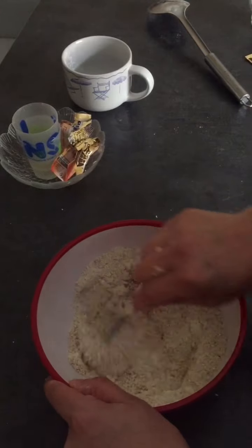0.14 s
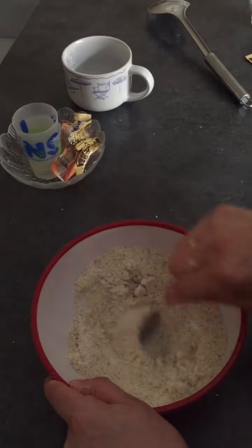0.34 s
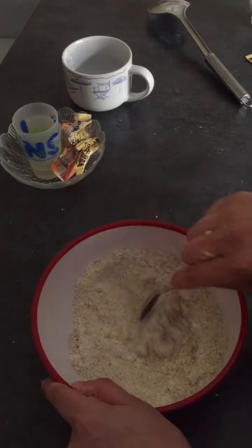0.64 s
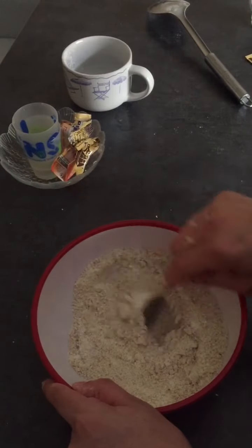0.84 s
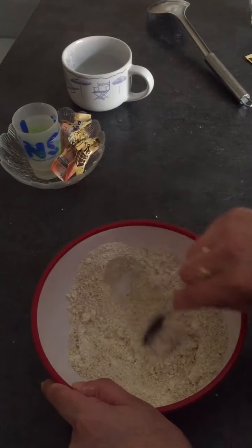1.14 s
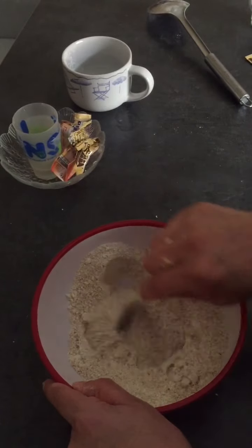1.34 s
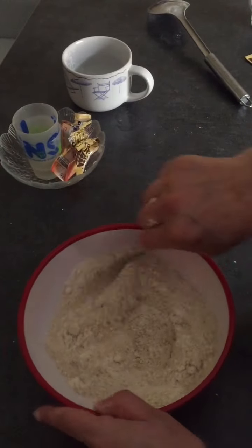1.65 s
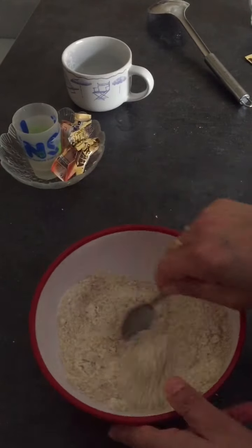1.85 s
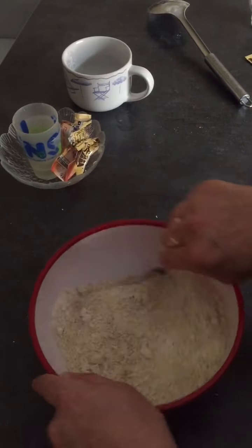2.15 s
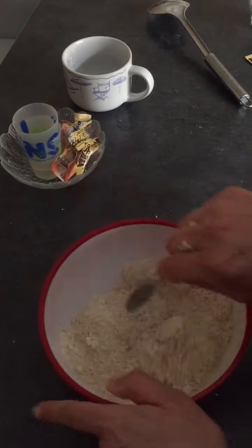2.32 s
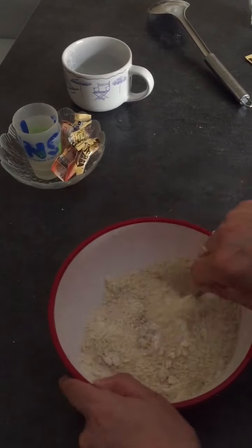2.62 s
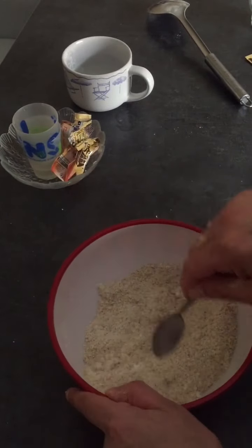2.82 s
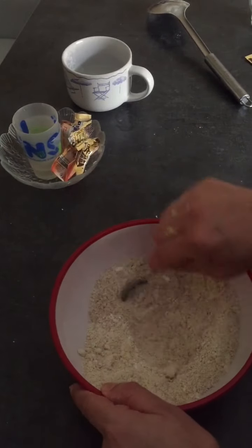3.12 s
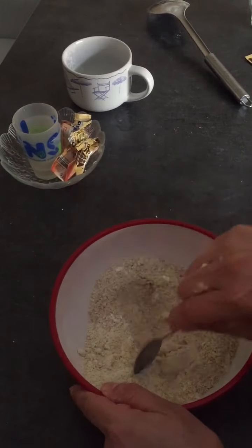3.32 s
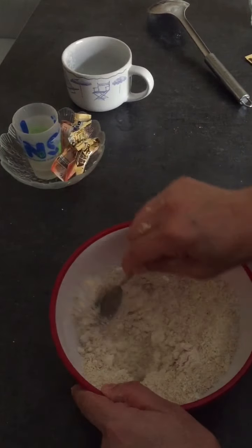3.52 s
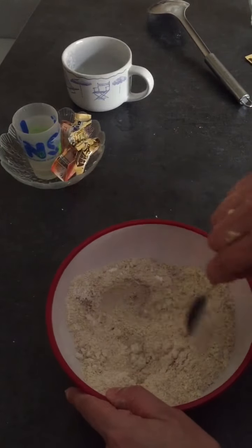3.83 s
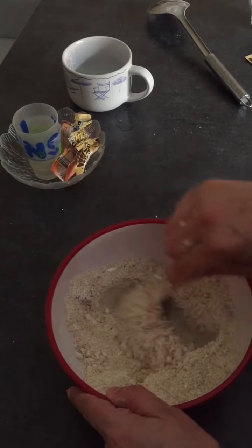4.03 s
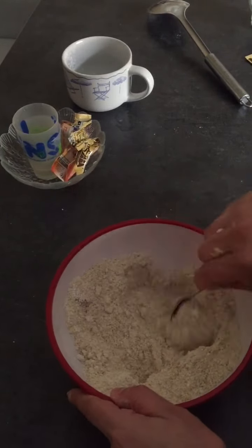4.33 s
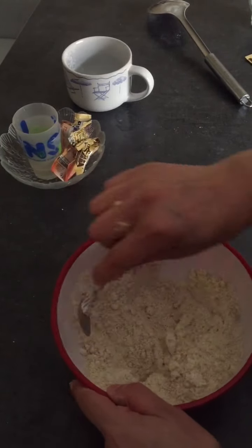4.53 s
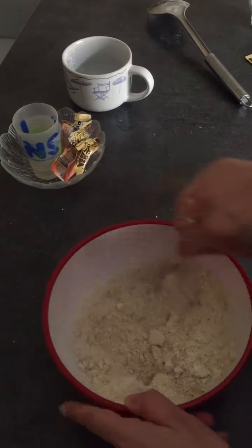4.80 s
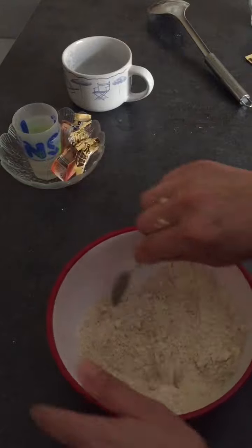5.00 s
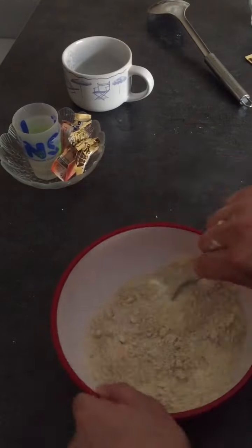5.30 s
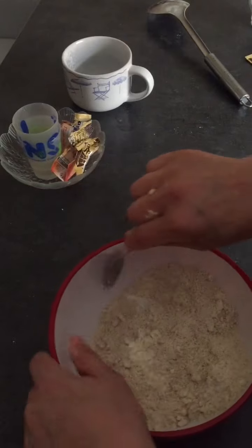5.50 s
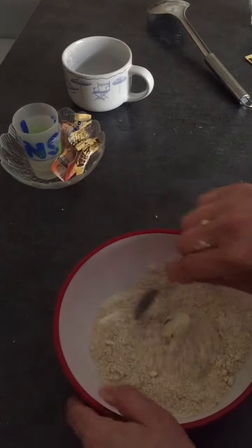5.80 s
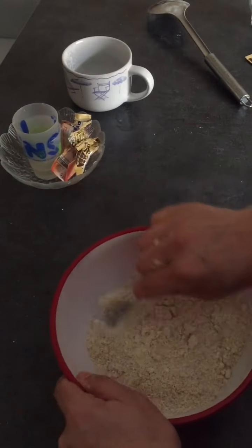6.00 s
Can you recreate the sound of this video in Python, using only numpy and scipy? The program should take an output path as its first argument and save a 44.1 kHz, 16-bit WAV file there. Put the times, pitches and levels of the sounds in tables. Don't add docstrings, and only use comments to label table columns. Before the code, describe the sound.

Close-up dry stirring in a quiet, lightly reverberant kitchen with steady low hum. Sparse soft spoon taps give way to crackling crumbs and rasping along the bowl wall, one loud sharp knock, a hollow bump as the bowl shifts on the counter, a pause, then renewed ticks, gritty sweeps and stronger knocks at the end.

```python
import sys
import numpy as np
from scipy import signal
from scipy.fft import rfft, irfft, next_fast_len
from scipy.io import wavfile
from scipy.ndimage import uniform_filter1d, map_coordinates

SR = 44100
rng = np.random.default_rng(int(sys.argv[2]) if len(sys.argv) > 2 else 0)


def persist_wave(psi):
    counts = np.round(np.clip(psi, -1, 1) * 32767).astype(np.int16)
    wavfile.write(sys.argv[1], SR, np.atleast_2d(counts).T)


def gain_from_decibels(decibels):
    exponent = np.asarray(decibels, float) / 20
    return 10 ** exponent


N = 271347
TIME = np.arange(N) / SR

# [t/s, edge level/dB, belly, flank and wall level/dB re edge]
TAPS = [(0.1612, -38, 0, -12, 11), (0.1903, -37, -14, -10, 5), (1.13, -44, -1, 8, -5),
        (1.6152, -29, -40, -5.5, 0.5), (2.139, -32.5, -12, -8, -5), (2.219, -26.5, -39, -15, -7),
        (2.5358, -6, -28, -11.5, -6), (3.5336, -45, 1, 9, 3), (4.0731, -29, -4, -33, -3.5),
        (4.3366, -34.5, -5.5, 5, 4.5), (4.3944, -38.5, -10, 1, -11), (4.7222, -33, -17.5, -33.5, 1.5),
        (4.777, -27.5, -46, -29, 1), (4.9045, -27.5, -6, -35, 8.5), (5.221, -18, -29, -3.5, -0.5),
        (5.6321, -20.5, -42, -2, 2.5), (6.0296, -9, -30, -17, -2.5), (6.0835, -29, -36, -9, 4)]
# [t/s, edge level/dB, belly, flank and wall level/dB re edge]
THUDS = [(2.2784, -41, 10.5, 1.5, 4), (3.2939, -51, 31.1, 39, 22.5), (3.3188, -58, 24, 26, 28),
         (5.035, -51.5, 16.4, -11, 12.5), (5.4494, -47.5, 15.4, -11, 1), (2.298, -47.5, 14, -5.5, -7.5),
         (4.957, -51.5, 14.7, -2, -8), (5.787, -51, 12, -3, -7), (2.322, -50, 15, -8, -8),
         (1.845, -58, 14, -8, -8), (5.236, -54, 14, -8, -8), (5.27, -54, 14, -8, -8),
         (3.365, -56, 14, -4, -8), (5.486, -54, 14, -8, -8), (4.908, -40, -4, -20, 8)]
# [t/s, edge level/dB]
TOUCHES = [
    (0.642, -56),
    (3.0498, -68),
    (3.1338, -60),
    (3.9988, -69),
]
# [belly, flank, wall level/dB re edge]
LIGHT_TOUCH = (-11.5, -13, -1)
# [f/Hz, level/dB, t60/s]
PART_MODES = [
    [(3823, -4, 0.0071), (4493, -5.5, 0.0079), (5433, -5.5, 0.0071), (6014, -6.5, 0.007), (7240, -17, 0.01),
     (8520, -13, 0.0083), (9300, -15.5, 0.0073)],
    [(244, -13, 0.059), (484, 1.5, 0.0086), (657, 2.5, 0.018), (766, 8, 0.02), (940, 1.5, 0.012)],
    [(1101, 5.5, 0.0055), (1321, 4.5, 0.0079), (1588, 0, 0.007), (1706, -5, 0.015)],
    [(2000, 0, 0.011), (2350, 1.5, 0.007)],
    [(2560, 1, 0.012), (2810, -4, 0.0071)],
    [(3140, -5, 0.012), (3280, -11, 0.013)],
    [(10220, 3, 0.0051), (10930, 1.5, 0.0036), (12370, 2, 0.0074), (13800, -3.5, .003),
     (15000, 0.5, 0.0025)],
]
EDGE_MODES, TIP_MODES = PART_MODES[0], PART_MODES[-1]
# [t/s, upper wall level/dB, rim level/dB, both re lower wall]
CONTACT_HEIGHT = [(0.2, -1.5, 0.5), (1.14, 7.5, -4.5), (1.62, -3, 0), (1.8, 11.5, -6), (2.0, 1, -3),
                  (2.15, 2.5, -1.5), (2.3, 6, -2), (2.55, -0.5, -1), (2.8, -1, -3), (3.4, -3.5, 0.5),
                  (4.1, -2, -2.5), (4.36, 1.5, -14), (4.74, -5.5, -9.5), (4.9, 0.5, -10.5),
                  (5.26, -4.5, -7), (5.66, -3, -15), (5.85, 7, -9.5), (6.05, -9, -1.5)]
height_s, upper_points, rim_points = np.transpose(CONTACT_HEIGHT)
UPPER_DB = np.interp(TIME, height_s, upper_points)
RIM_DB = np.interp(TIME, height_s, rim_points)


def spoon_strikes():
    hits = [(*row, -16.5) for row in TAPS]
    hits += [(*row, -7.5) for row in THUDS]
    hits += [(*row, *LIGHT_TOUCH, -16.5) for row in TOUCHES]
    knocks = []
    for s, edge_db, belly, flank, wall, tip in hits:
        at = round(s * SR)
        above = [0, belly, flank, wall + RIM_DB[at], wall, wall + UPPER_DB[at], tip]
        knock = sum(gain_from_decibels(db) * ring(modes, scatter=0.015) for modes, db in zip(PART_MODES, above))
        knocks.append((s, gain_from_decibels(edge_db - 5.0) * knock))
    return contacts(knocks)


# [t/s, level/dB,
# f/Hz]
TINKS = [(.1618, -38, 12500), (.163, -42, 9400), (.1635, -36, 4200), (.169, -36, 4300), (.174, -35, 4050),
         (4.0735, -38, 7400), (1.7842, -34, 6500), (1.68, -40, 4100), (5.7425, -34, 6300),
         (5.2205, -30, 6600), (.1714, -42, 12600), (.1905, -44, 8500), (1.1318, -50, 8600),
         (1.1405, -40, 3150), (1.143, -52, 12300), (1.6596, -40, 11700), (1.7095, -44, 12100),
         (1.7735, -38, 13000), (1.794, -36, 8400), (2.1929, -43, 11300), (2.2283, -41, 11400),
         (2.512, -58, 5200), (2.5358, -21, 12400), (2.5358, -20, 3250), (3.2945, -50, 5200),
         (3.535, -44, 320), (3.5336, -48, 3200), (4.3365, -34, 8800), (4.3365, -38, 6300),
         (4.3365, -33, 3600), (4.3365, -38, 9700), (4.7222, -34, 12800), (4.7378, -38, 5400),
         (4.7535, -43, 11900), (4.857, -35, 12800), (4.8675, -38, 12400), (5.2205, -32, 11600),
         (5.3223, -43, 11500), (5.466, -52, 12300), (5.534, -56, 11800), (5.632, -32, 12700),
         (5.632, -34, 13400), (5.633, -30, 3350), (4.337, -28, 1130), (5.7648, -35, 12700),
         (5.754, -42, 13500), (6.0293, -24, 12500), (6.0293, -28, 13800), (6.0835, -40, 13000)]


def steel_tinks():
    knocks = []
    for s, db, hz in TINKS:
        t60 = 45.0 / hz ** 0.9 / 2.5
        knocks.append((s, gain_from_decibels(db) * ring([(hz, -2.5, t60)], scatter=0.012)))
    return contacts(knocks)


# [t/s, peak level/dB, f/Hz]
CRACKS = [(0.1714, -31, 4160), (1.132, -32, 3400), (1.6494, -46, 2500), (1.697, -43, 4100),
          (1.709, -34, 2700), (1.754, -23.5, 6360), (1.7737, -27.5, 3900), (1.7842, -26, 4800),
          (1.7907, -26, 6400), (1.8004, -36, 3650), (2.1613, -35, 4090), (2.1893, -33, 3560),
          (2.2114, -32.5, 3300), (2.2273, -28, 3300), (2.2322, -22.5, 6600), (2.2368, -31, 2610),
          (2.2606, -27, 2630), (2.2721, -26.5, 3390), (2.6366, -31.5, 2530), (2.652, -27.5, 2640),
          (2.6565, -30.5, 5600), (4.7378, -32.5, 3700), (4.7872, -34, 2730), (4.8344, -35, 4100),
          (4.8574, -21, 7430), (4.9206, -28.5, 2880), (5.3461, -32, 4240), (5.7422, -27.5, 3770),
          (5.7686, -19.5, 5640), (6.0935, -25.5, 4370)]
# [t/s, peak level/dB, f/Hz]
GRIT = [(1.14, -45, 4870), (1.1484, -52, 6040), (1.6586, -33, 7310), (1.7472, -31, 6950),
        (1.7653, -29, 6050), (2.139, -44, 5500), (2.1934, -33, 8440), (2.2457, -25, 8100),
        (4.757, -28.5, 5350), (4.7955, -34, 6600), (4.806, -35, 5540), (4.8222, -30.5, 7020),
        (4.8569, -28.5, 7030), (4.862, -25, 7000), (4.8669, -29, 6860), (4.885, -27, 7300),
        (5.3105, -34, 5300), (5.323, -32, 5420), (5.3458, -24.5, 5600), (5.5507, -49, 7020),
        (5.7335, -31, 5300), (5.778, -21.5, 6800)]


def crumb_cracks():
    partials = [(0.75, -5), (1, 1.5), (1.25, -5), (1.55, -12), (2.1, -22)]  # (ratio, dB)
    knocks = []
    for s, db, hz in CRACKS + GRIT:
        grain = [(ratio * hz, share_db, 34.0 / hz) for ratio, share_db in partials]
        knock = ring(grain, scatter=0.08) + gain_from_decibels(-28) * ring(TIP_MODES, scatter=0.05)
        knocks.append((s, gain_from_decibels(db - 4.5) * knock))
    return contacts(knocks)


# [t/s, level/dB]
SPITS = [(.0497, -68), (.1618, -44), (.5554, -73), (1.052, -72), (1.1404, -64), (1.6596, -48),
         (1.7095, -51), (1.8004, -54), (2.1905, -49), (2.5359, -28.5), (2.6366, -46), (2.838, -73),
         (3.66, -71), (3.9988, -65.5), (4.885, -58), (5.3475, -47), (4.3365, -52), (4.7224, -39),
         (4.8205, -42.5), (4.8674, -41), (5.0354, -74), (5.3196, -60), (5.4494, -60), (5.7422, -45),
         (5.7686, -39.5), (5.779, -44)]


def grit_spits():
    modes = TIP_MODES + EDGE_MODES[-3:]
    return contacts([(s, gain_from_decibels(db) * ring(modes, scatter=0.031)) for s, db in SPITS])


# [t/s, wall level/dB, decay/s, crumb level/dB re wall]
SKIDS = [(.001, -67, 0.86, -3), (0.172, -44, 0.14, -1), (1.132, -46.5, 0.12, -7), (1.633, -48.5, 1, 1),
         (2.146, -49, 0.53, 2), (2.55, -36.5, 0.53, -23), (3.297, -64, .5, -15.5), (4.077, -44.5, 0.3, -3),
         (4.349, -51.5, 0.57, -6.5), (4.728, -45.5, 1, -5), (5.233, -41, 0.66, -10),
         (5.638, -44.5, 0.83, -23), (6.041, -42, 0.022, -13)]
# [peak t/s, wall level/dB, build-up/s, decay/s, crumb level/dB re wall]
SWEEPS = [(1.7, -50, 0.065, 0.52, 3.5), (2.84, -63.5, 0.11, .08, -13), (1.797, -47.5, 0.082, 0.12, 6),
          (1.91, -55, 0.28, 0.19, -7), (1.66, -50, .04, .5, 2), (.16, -58, .009, .02, 2),
          (1.129, -60, .018, .02, 0), (4.334, -63, .025, .02, 2), (2.53, -64, .025, .02, -3),
          (4.76, -50, .012, .08, 3), (5.1, -60, .05, .4, -12), (2.225, -43, .016, 0.61, -0.5),
          (2.648, -45.5, 0.049, 0.45, -0.5), (2.837, -71.5, 0.034, 0.22, -1),
          (3.545, -56.5, 0.024, 0.18, -2), (4.15, -55, 0.081, 0.5, -5), (4.399, -49, 0.035, 0.044, -13.5),
          (4.48, -65, 0.087, 0.16, -9), (4.855, -57, 0.15, 0.78, 11), (4.914, -43, 0.03, 0.45, -8),
          (5.324, -44, 0.031, 0.4, 2.5), (5.458, -54, 0.089, 0.89, -5), (5.778, -50, 0.11, 0.086, 5),
          (5.79, -45, 0.052, 0.38, -9), (6.09, -42, 0.051, 0.4, -9)]
# [f/Hz, width/Hz, level/dB]
WALL = [(2480, 80, 2), (2661, 79, 4.5), (2835, 130, 0.5), (3950, 240, -8.5), (4240, 250, -11)]
# [f/Hz, width/Hz, level/dB]
UPPER_WALL = [(3100, 130, 1.5), (3320, 200, 1.5), (3700, 500, -6.5)]
# [f/Hz, width/Hz, level/dB]
RIM = [(1700, 750, -9.5), (2050, 250, 0), (2390, 180, -4.5)]
# [f/Hz, width/Hz, level/dB]
CRUMB = [(5600, 600, 3.5), (6750, 670, 2.5), (7840, 870, 1.5), (8650, 560, -0.5), (9406, 1000, -4.5)]
# [f/Hz, width/Hz, level/dB]
DUST = [(10900, 1000, -7.5), (12400, 900, -4.5), (13300, 900, -6.5), (14500, 1200, -9)]


def edge_scrape(judder):
    moves = [(s, db, 0.006, dies, crumb_db) for s, db, dies, crumb_db in SKIDS] + SWEEPS
    moves += [(tap[0], -72, 0.03, 0.01, -3) for tap in TAPS]
    force = pressure(moves)
    wall = rubbing(WALL, per_second=1400, spread_db=2.0, smooth=0.8, clump_db=3.0, judder=judder)
    upper = rubbing(UPPER_WALL, per_second=1400, spread_db=2.0, smooth=1.0, clump_db=3.0, judder=judder)
    rim = rubbing(RIM, per_second=1400, spread_db=2.0, smooth=0.8, clump_db=0.5, judder=judder)
    crumbs = rubbing(CRUMB, per_second=4000, spread_db=3.5, smooth=0.9, clump_db=2.6, judder=judder)
    dust = rubbing(DUST, per_second=1500, spread_db=4.0, smooth=0.7, clump_db=4.2, judder=judder)
    shell = gain_from_decibels(-UPPER_DB / 2) * wall + gain_from_decibels(UPPER_DB / 2 - 4.0) * upper
    shell += gain_from_decibels(RIM_DB - UPPER_DB / 2 - 2.5) * rim
    grains = pressure(moves, faster=1.7, above=0.92) * crumbs
    grains += gain_from_decibels(-9) * pressure(moves, faster=2.2, above=0.76) * dust
    return force * shell + grains


# [peak t/s, level/dB, build-up/s, decay/s]
GLINTS = [(.165, -51, .004, .2), (1.14, -66, .02, .1), (1.66, -58, .03, .2), (1.8, -50.5, .05, .2),
          (2.25, -56, .05, .2), (2.545, -52, .008, .3), (4.35, -64, .01, .3), (4.76, -57, .03, .3),
          (4.87, -54, .05, .3), (5.34, -57, .04, .15), (5.46, -64, .03, .4), (5.64, -57, .008, .2),
          (5.77, -49, .1, .22), (6.04, -52, .008, .5)]
# [f/Hz, width/Hz, level/dB]
TIP = [(11600, 300, -10), (12450, 260, 0), (13100, 450, -2.5)]


def tip_hiss(judder):
    hiss = rubbing(TIP, per_second=1500, spread_db=3.0, smooth=0.9, clump_db=3.0, judder=judder)
    return pressure([(*row, 0) for row in GLINTS]) * hiss


# [peak t/s, drone level/dB, build-up/s, decay/s, foot level/dB re drone]
SHOVES = [(.01, -57, 0.012, 0.32, -43), (.17, -51, 0.0036, 0.24, -6.5), (1.132, -64, 0.0074, 0.077, -25),
          (1.62, -46.5, 0.011, 0.16, -12), (1.8, -47, 0.21, 0.64, -18), (1.91, -41, 0.11, 0.33, -8.5),
          (2.145, -52.5, 0.0069, 0.8, -12), (2.46, -56, .1, 0.38, -12), (2.83, -59.5, 0.18, 0.11, -16),
          (2.285, -31, 0.011, 0.42, -19.5), (3.29, -52, .02, .02, -10), (2.55, -48.5, 0.0071, 0.29, -5.5),
          (2.648, -42.5, 0.044, 0.35, -13), (3.3, -32.5, 0.0086, 0.18, -22.5),
          (3.344, -47.5, 0.023, 0.81, -23.5), (3.544, -53, 0.059, 0.2, -5.5),
          (4.08, -37, 0.0045, 0.11, -25.5), (4.11, -64, 0.0087, 0.75, -28), (4.35, -62, .006, 1.2, -13),
          (4.78, -66, 0.17, 0.35, 0.5), (4.972, -40, 0.14, 0.42, -12), (5.275, -42, 0.051, 0.67, -17),
          (5.458, -34, 0.025, 0.55, -19), (5.68, -50, 0.1, 0.69, -27), (5.735, -42, .025, .5, -14),
          (5.785, -39, 0.05, 0.74, -12.5), (6.046, -33, 0.0062, 0.053, -17), (6.09, -55, 0.026, 1.1, -8)]
# [f/Hz, width/Hz, level/dB]
DRONE = [(538, 86, -7), (647.5, 40, 1.5), (735, 35, -1), (810.6, 40, -8), (875.3, 24, -7.5), (931, 35, -6),
         (1300, 300, -17.5)]


def bowl_drone():
    return pressure(SHOVES) * rubbing(DRONE, per_second=400, spread_db=2.5, smooth=1.1, clump_db=2.8, judder=0)


def stirring():
    judder = 1.6 * wobble(110) + 1.2 * wobble(35)
    direct = gain_from_decibels(-4.5) * (edge_scrape(judder) + tip_hiss(judder) + bowl_drone())
    return direct + gain_from_decibels(-9.5) * signal.fftconvolve(direct, kitchen(count=1, gap=0.00043)[0])[:N]


# [t/s, length/s, f/Hz, level/dB]
SQUEAKS = [(.001, 0.067, 1140, -62.5), (.001, 0.056, 2540, -65), (1.4, 0.014, 1300, -67),
           (1.52, 0.041, 4960, -83), (1.605, 0.03, 4300, -67), (3.057, 0.02, 1200, -71),
           (3.227, 0.075, 4810, -78), (3.407, .055, 1950, -65.5), (3.51, 0.088, 2050, -67),
           (4.364, 0.029, 1065, -55), (1.166, 0.041, 1150, -62), (0.812, 0.13, 1728, -78),
           (4.615, 0.042, 793, -68.5), (4.643, 0.12, 4440, -77), (1.66, .03, 80, -72),
           (5.306, 0.041, 50.93, -63), (6.068, 0.041, 67.8, -62)]


def squeaks():
    out, air, f = np.zeros(N), rfft(rng.standard_normal(SR)), np.fft.rfftfreq(SR, 1 / SR)
    for s, length, hz, db in SQUEAKS:
        octave_width = 0.1 + 150 / (hz + 500)
        band = irfft(air * np.exp(-(np.log((f + 1) / hz) / octave_width) ** 2))
        out += gain_from_decibels(db) * np.exp(-((TIME - s) / length) ** 2) * unit(np.resize(band, N))
    return out


# [f/Hz, width/Hz, level/dB]
FOOT = [(223, 50.4, -4), (241.6, 64, -1.5), (378, 110, -6.5)]


def foot_grind():
    grind = gain_from_decibels(-80.5) + pressure(SHOVES, faster=0.82, above=0.96)
    return grind * rubbing(FOOT, per_second=200, spread_db=5.0, smooth=0.69, clump_db=2.5, judder=0)


# [f/Hz, level/dB per Hz]
SLEEVE = [(300, -29.5), (800, 0.5), (1600, -0.5), (3000, -6.5), (5000, -13), (7000, -26), (12000, -34)]


def hand_shuffle():
    digging = uniform_filter1d(pressure(SWEEPS, above=0.82), size=round(0.1 * SR))
    level = gain_from_decibels(-80.5) + gain_from_decibels(-11.5) * digging
    return level * gain_from_decibels(1.5 * wobble(47)) * noise(SLEEVE, patchy_db=4.0)


# [f/Hz, level/dB per Hz]
HUM = [(15, -57), (25, -22), (103, -1), (163, -4.5), (192, -6.5), (259, -6.5), (304, -26), (410, -12.5),
       (979, -21.5), (1680, -20.5), (2600, -22.5), (3410, -23), (15200, -32.5), (16500, -44.5)]


def room_hum():
    return gain_from_decibels(-70.37 + 0.5 * wobble(6)) * noise(HUM, patchy_db=0.9)


# [f/Hz, t60/s]
KITCHEN = [(200, .38), (600, .44), (1500, .42), (3500, .5), (7000, .36), (10000, .26), (14000, .19)]


def kitchen(count, gap):
    hz, t, z = signal.stft(rng.standard_normal((count, SR // 2)), SR, nperseg=256)
    decay_db = -60 * t / along(KITCHEN, hz)[:, None]
    tails = signal.istft(z * gain_from_decibels(decay_db), SR, nperseg=256)[1]
    tails *= np.clip(TIME[:tails.shape[1]] / gap - 1, 0, 1)
    return tails / np.linalg.norm(tails, axis=1)[:, None]


def contacts(knocks):
    out, tails = np.zeros(N + SR), gain_from_decibels(-9.0) * kitchen(count=12, gap=0.0026)
    for k, (s, knock) in enumerate(knocks):
        start = round(s * SR)
        echo = signal.fftconvolve(knock, tails[k % len(tails)])
        out[start:][:len(knock)] += knock
        out[start:][:len(echo)] += echo
    return out[:N]


def ring(modes, scatter):
    hz, db, t60 = np.transpose(modes)[:, :, None, None]
    size, tune = rng.standard_normal((2, len(modes), 2, 1))
    t = TIME[:SR // 40]
    turns = hz * (1 + scatter * tune * [[0.4], [1.5]]) * t
    rise = 1 - np.exp(-turns / 0.92)
    sign = (-1) ** np.arange(len(modes))[:, None, None]
    level = gain_from_decibels(db + 0.7 * size - [[0], [5.5]] - 60 * t / t60)
    return (sign * level * rise * np.sin(2 * np.pi * turns)).sum((0, 1))


def resonance(f, centre, width):
    return 1j * f * width / (centre * centre - f * f + 1j * f * width)


def rubbing(modes, per_second, spread_db, smooth, clump_db, judder):
    chance, size, bed = rng.random(N), rng.exponential(size=N), rng.standard_normal(N)
    slips = (chance < per_second / SR) * gain_from_decibels(spread_db * np.minimum(size, 3.5)) * np.sign(bed)
    z = signal.stft((unit(slips) + smooth * bed) * gain_from_decibels(judder), nperseg=256)[2]
    clumps = uniform_filter1d(rng.standard_normal(z.shape), size=7, axis=0)
    clumps = uniform_filter1d(clumps, size=5, axis=1)
    force = signal.istft(z * gain_from_decibels(clump_db * unit(clumps)), nperseg=256)[1][:N]

    def body(f):
        return sum((-1) ** k * gain_from_decibels(db) * resonance(f, c, w) for k, (c, w, db) in enumerate(modes))

    return unit(filtered(force, body))


def pressure(moves, faster=1, above=0):
    power = np.zeros(N)
    for s, db, rise, dies, extra_db in moves:
        span = slice(max(round((s - rise) * SR), 0), round((s + dies) * SR))
        t = TIME[span] - s
        swell = np.clip(t / rise + 1, 0, 1) ** 0.86
        shape = swell * gain_from_decibels(-60 * faster * np.maximum(t, 0) / dies)
        power[span] += (gain_from_decibels(db + above * extra_db) * shape) ** 2
    return np.sqrt(power)


def noise(spectrum, patchy_db):
    z = signal.stft(rng.standard_normal(N + 512), nperseg=512)[2]
    field = uniform_filter1d(rng.standard_normal(z.shape), size=6, axis=0)
    field = uniform_filter1d(field, size=12, axis=1)
    rough = signal.istft(z * gain_from_decibels(patchy_db * unit(field)), nperseg=512)[1][:N]
    return unit(filtered(rough, lambda hz: gain_from_decibels(along(spectrum, hz))))


def wobble(rate):
    return map_coordinates(rng.standard_normal(int(N * rate / SR) + 4), [TIME * rate])


def unit(x):
    return x / np.sqrt(np.mean(x ** 2) + 1e-20)


def along(points, hz):
    f, v = np.transpose(points)
    return np.interp(np.log(hz + 1), np.log(f + 1), v)


def filtered(x, response):
    m = next_fast_len(N + SR // 2)
    return irfft(rfft(x, m) * response(np.fft.rfftfreq(m, 1 / SR)), m)[:N]


def notches(dips, f):
    return np.prod([1 - np.clip(depth, 0, 1) * resonance(f, c, w) for c, w, depth in dips], axis=0)


# [f/Hz, width/Hz, depth 0-1]
COUNTER_DIPS = [(1660, 300, 0.14), (4830, 260, 0.65), (7650, 190, 0.2), (9900, 700, .55), (14300, 500, .4)]


def scene():
    strikes = spoon_strikes() + steel_tinks() + crumb_cracks() + grit_spits()

    def radiation(f):
        return notches(COUNTER_DIPS, f) * (1j * f / (170 + 1j * f)) ** 3

    bowl = filtered(stirring() + strikes, radiation)
    background = foot_grind() + hand_shuffle() + room_hum()
    return (bowl + squeaks() + background)[None]


def low_pass(x):
    return signal.sosfilt(signal.butter(12, 15750, fs=SR, output="sos"), x)


# [f/Hz, width/Hz, depth 0-1]
MICROPHONE_DIPS = [(2250, 110, 0.1), (4838, 210, 0), (10360, 500, 0.4), (11500, 400, 0.02)]


def record(dry):
    mic = filtered(dry[0], lambda f: notches(MICROPHONE_DIPS, f) / (1 + (f / 16400) ** 40))
    return low_pass(mic[None])


dry = scene()
out = record(dry)
persist_wave(out)
```